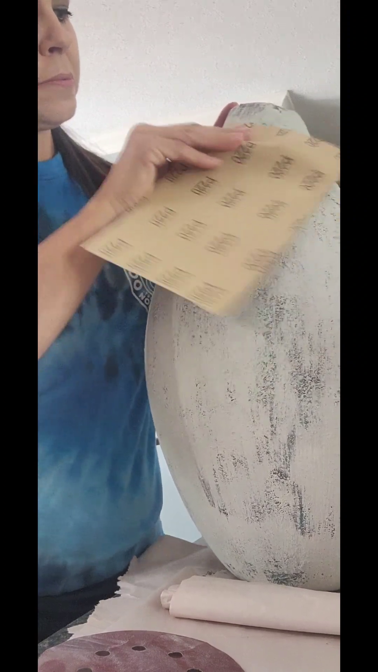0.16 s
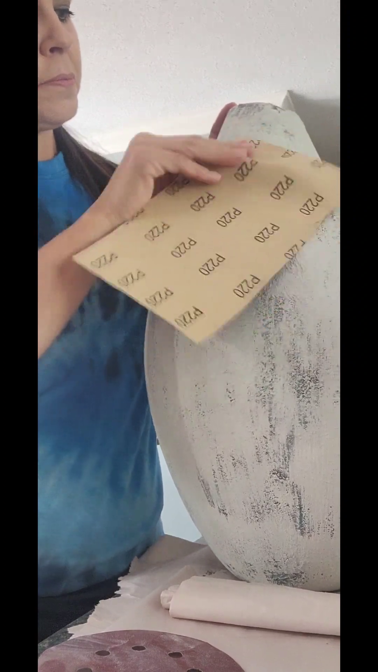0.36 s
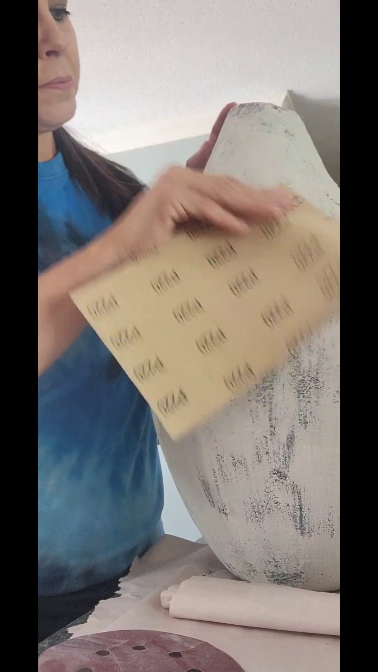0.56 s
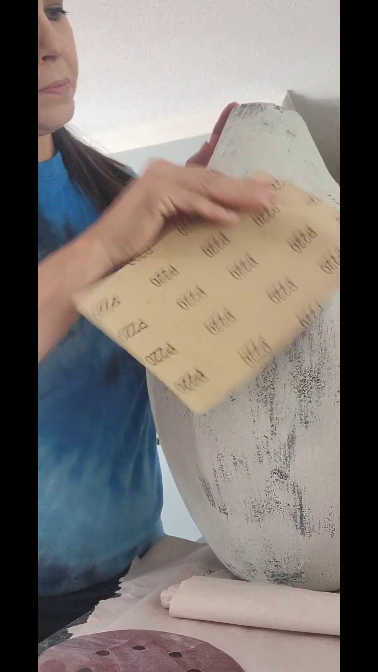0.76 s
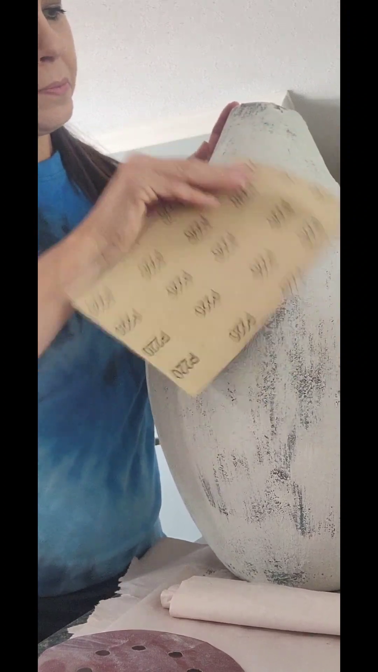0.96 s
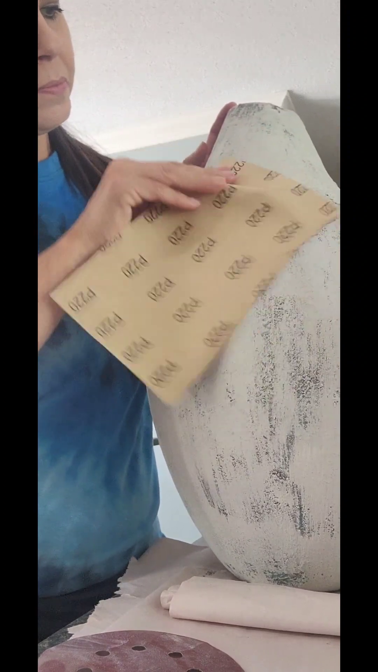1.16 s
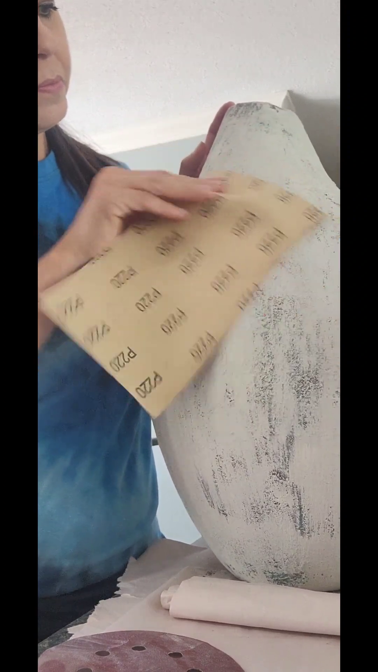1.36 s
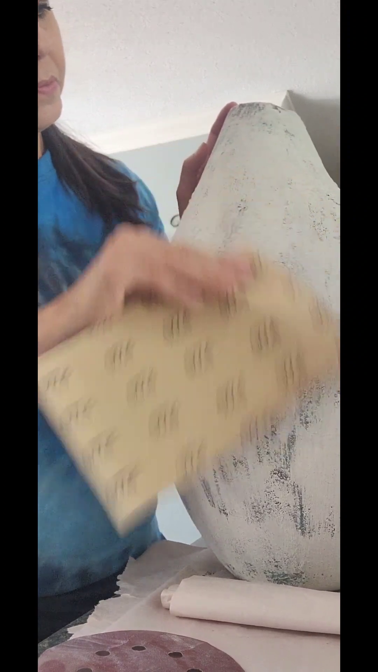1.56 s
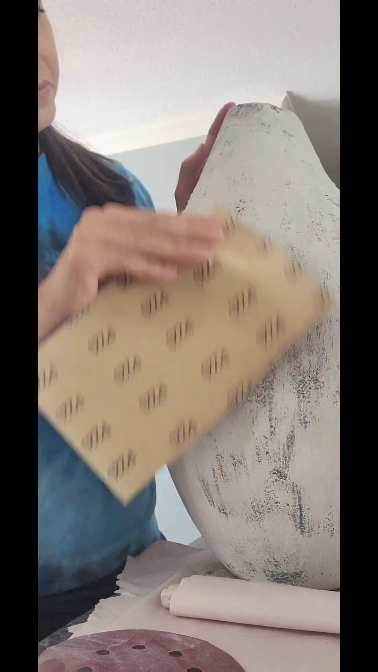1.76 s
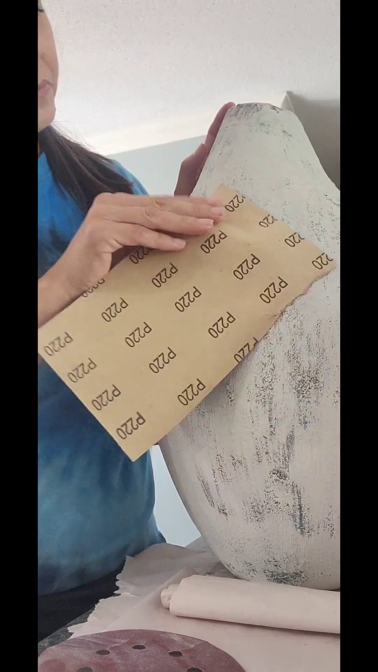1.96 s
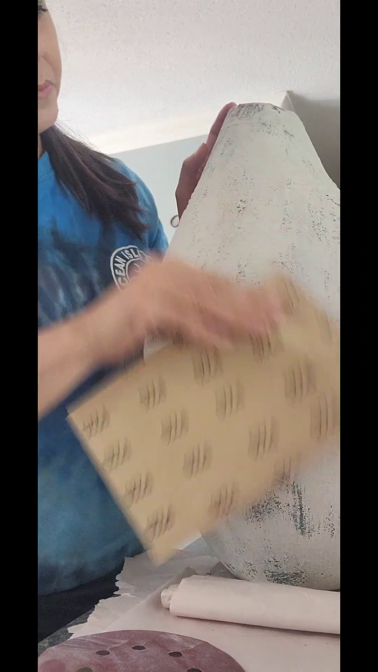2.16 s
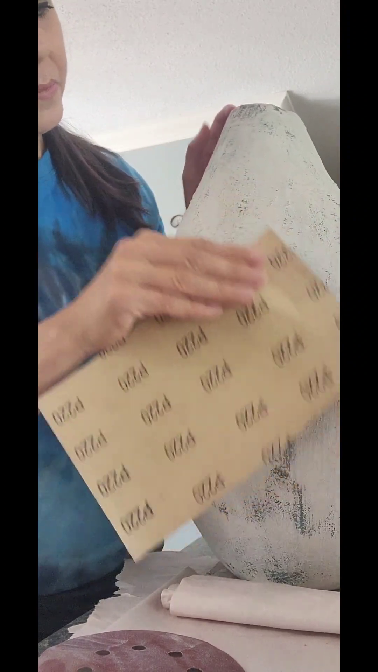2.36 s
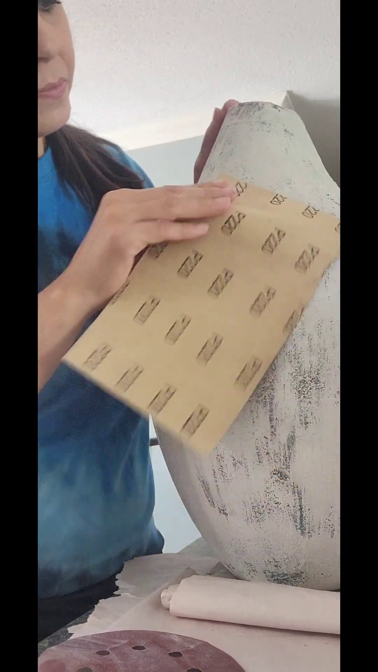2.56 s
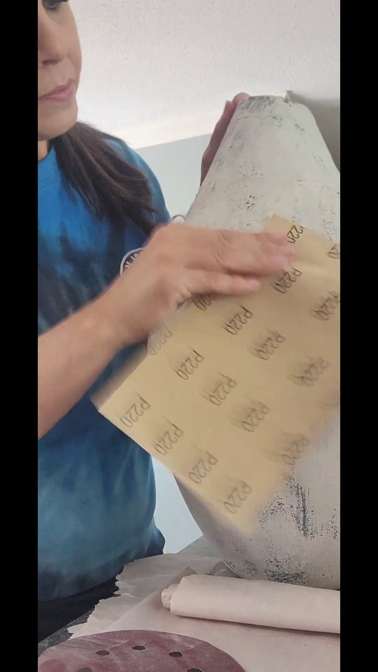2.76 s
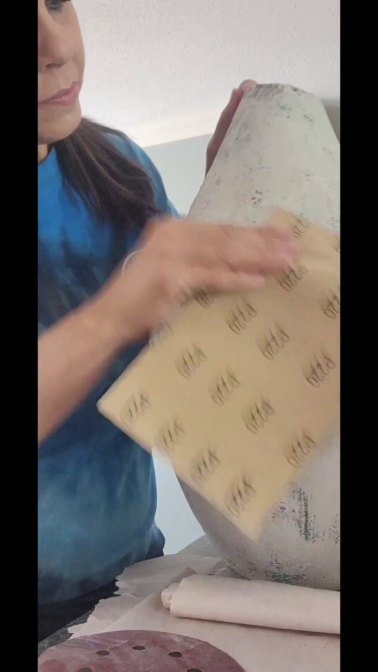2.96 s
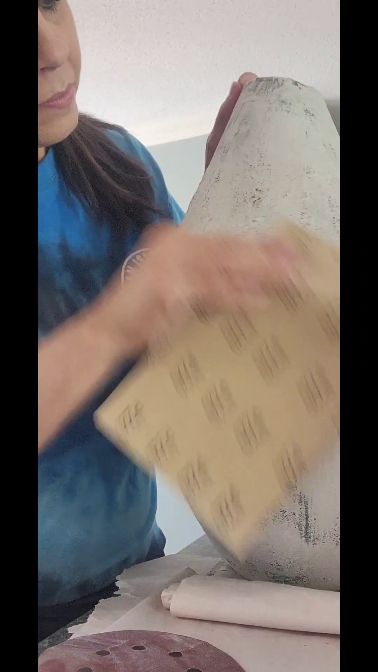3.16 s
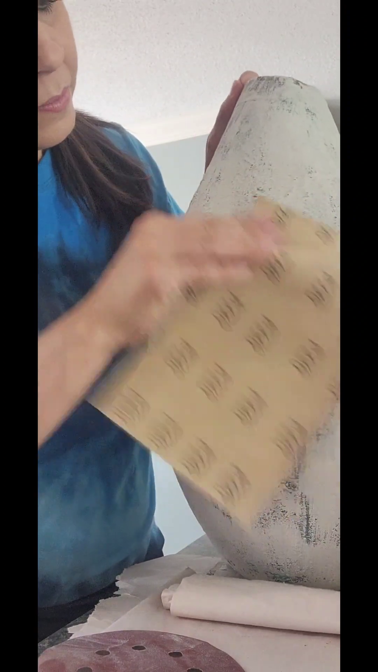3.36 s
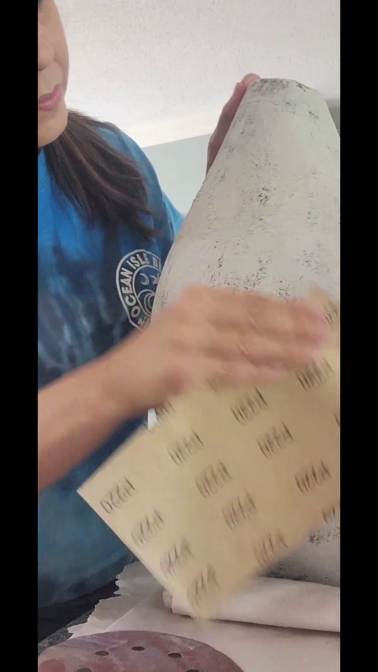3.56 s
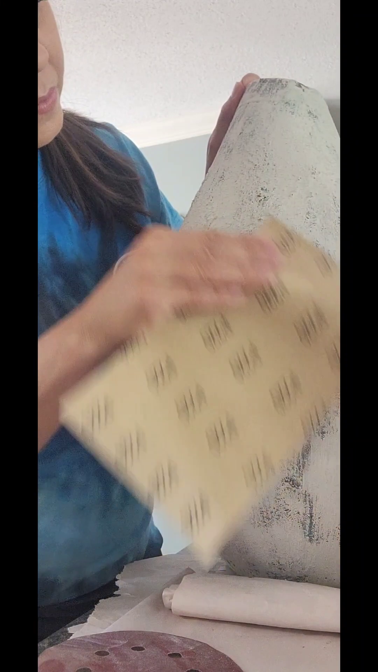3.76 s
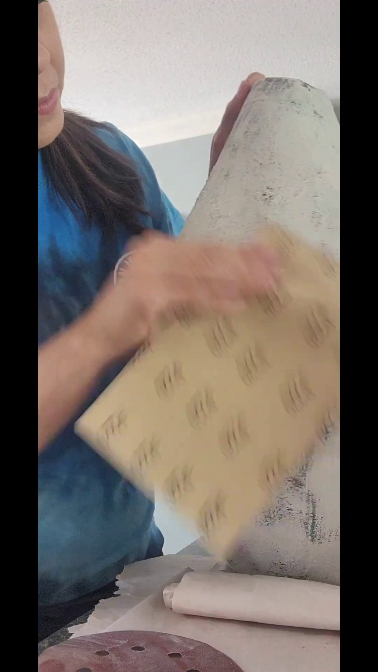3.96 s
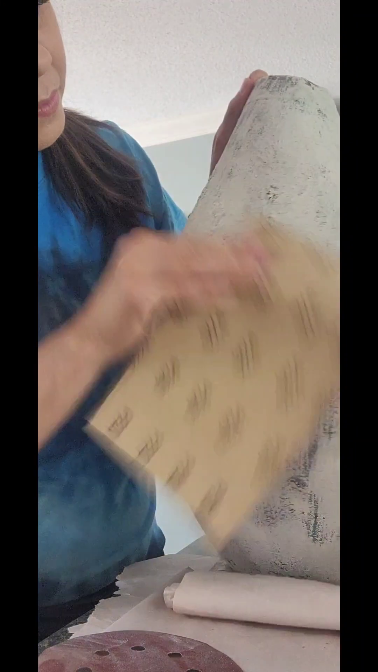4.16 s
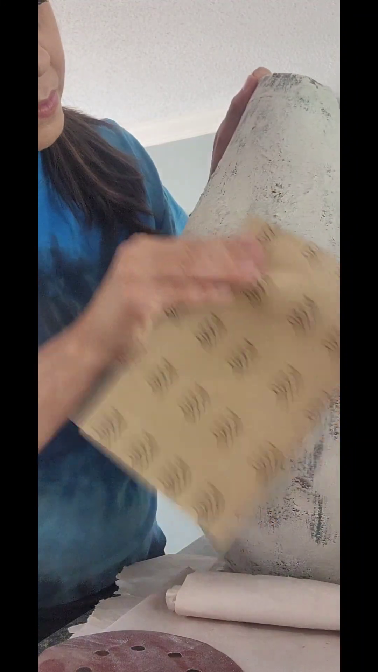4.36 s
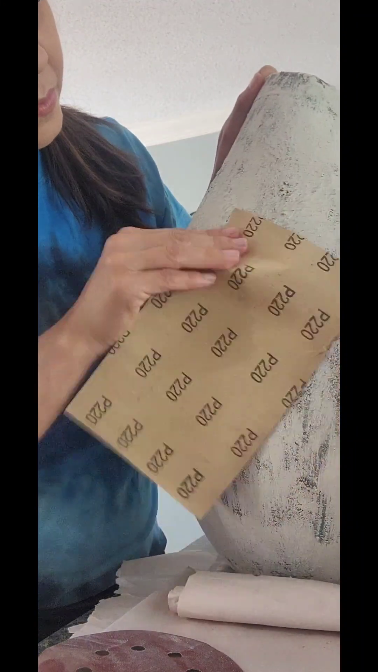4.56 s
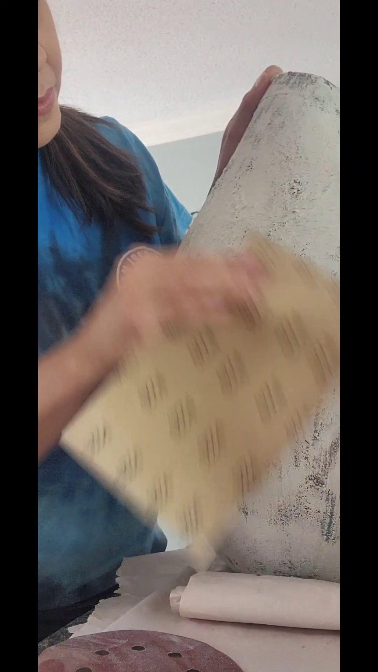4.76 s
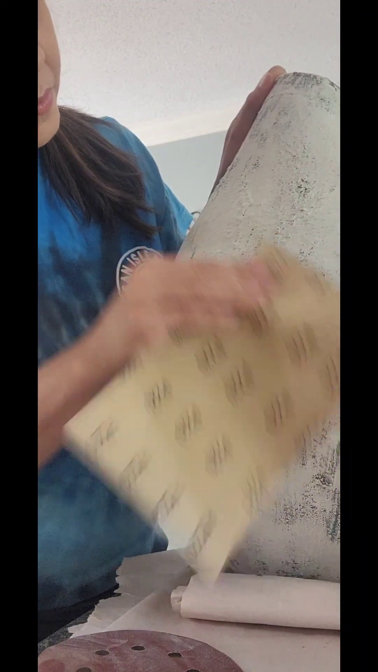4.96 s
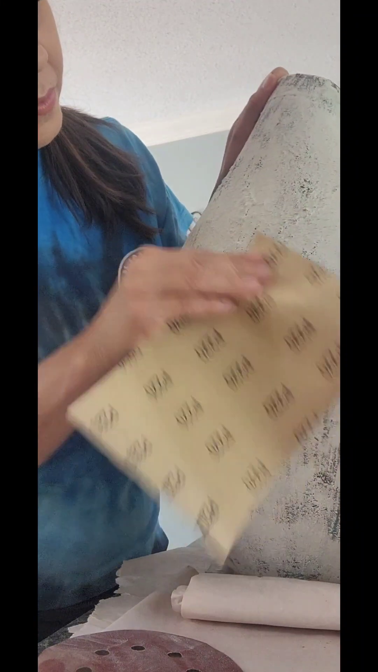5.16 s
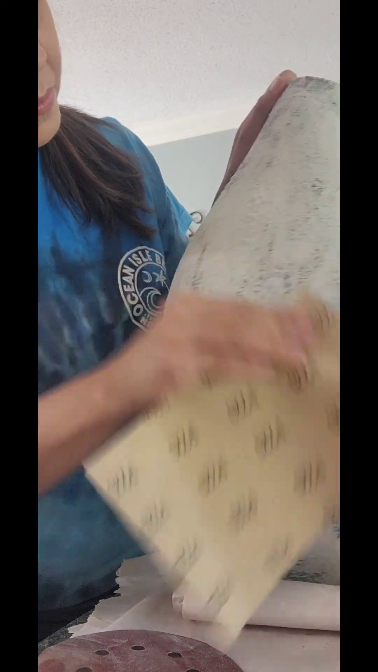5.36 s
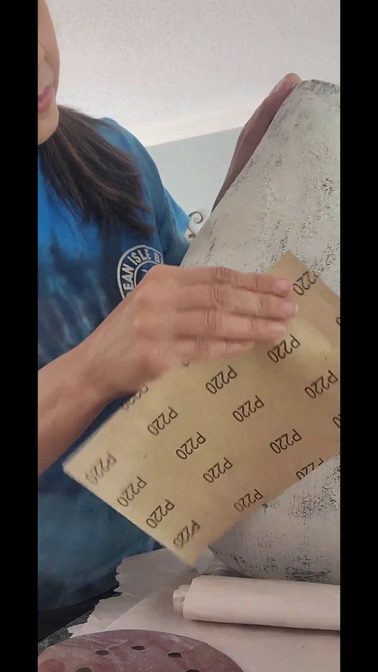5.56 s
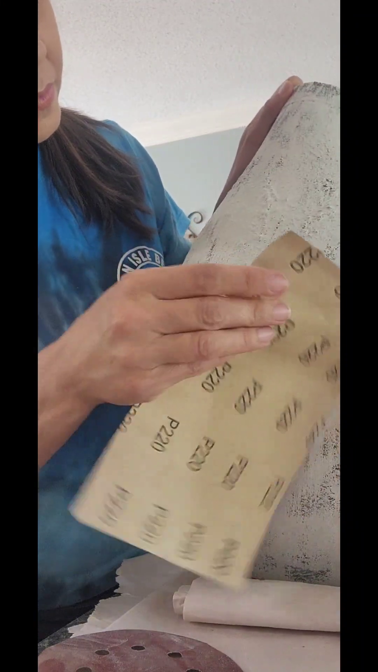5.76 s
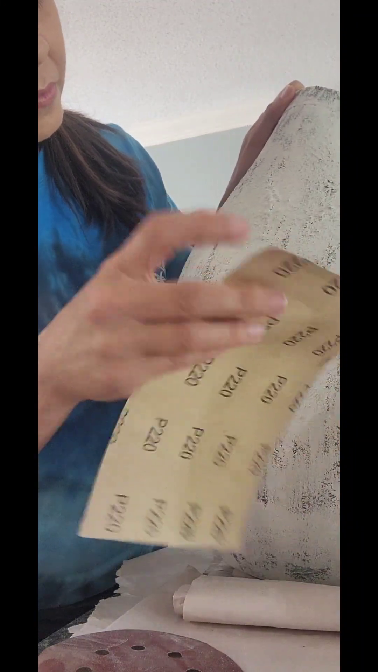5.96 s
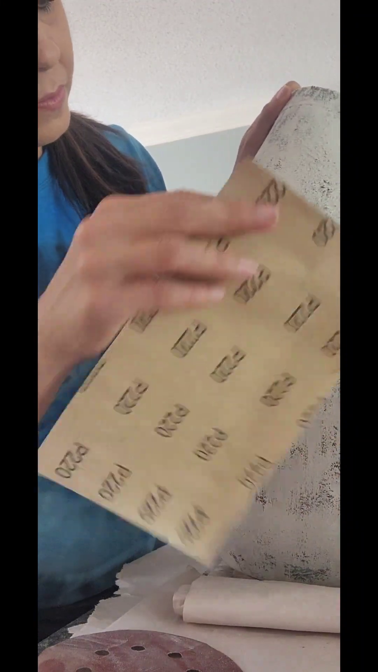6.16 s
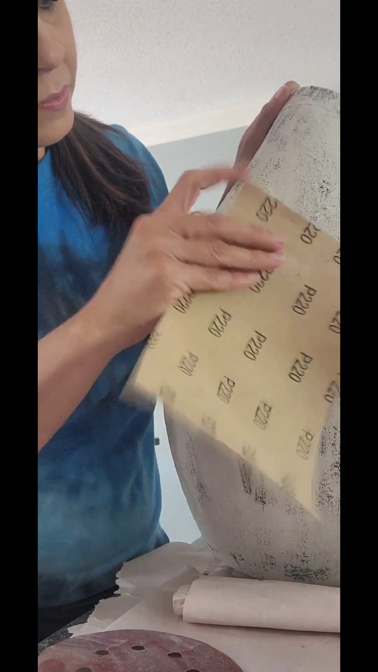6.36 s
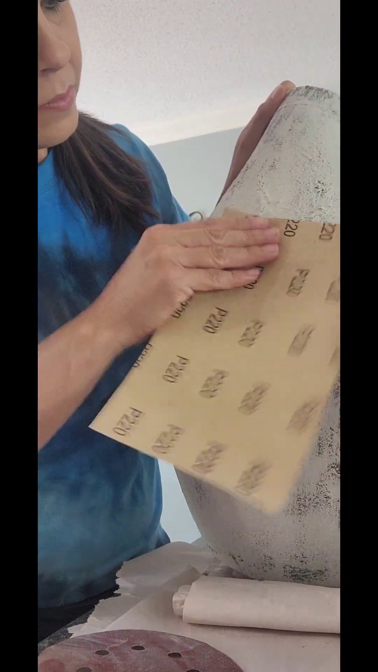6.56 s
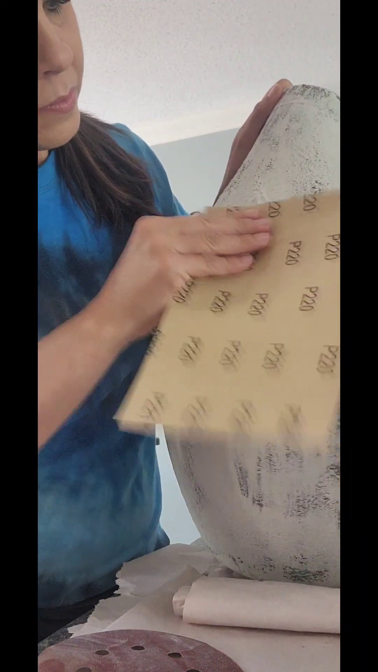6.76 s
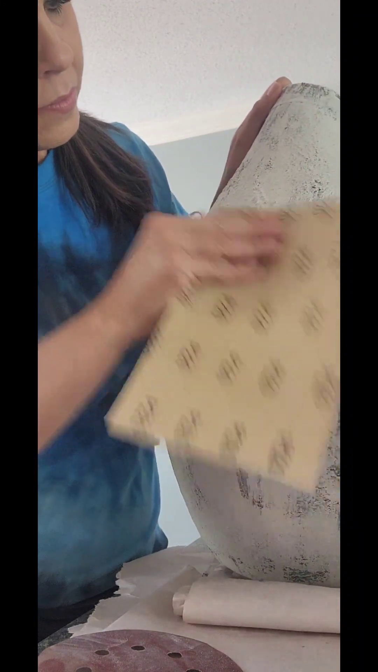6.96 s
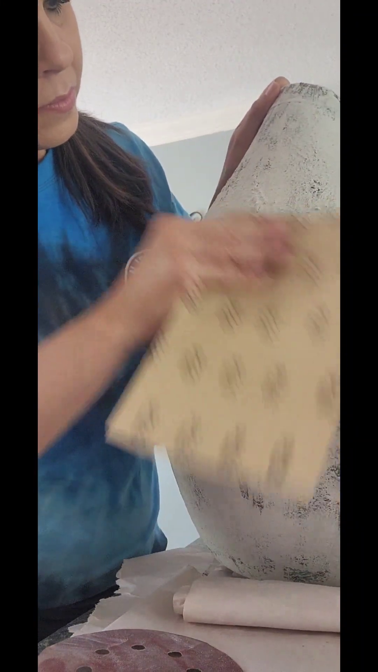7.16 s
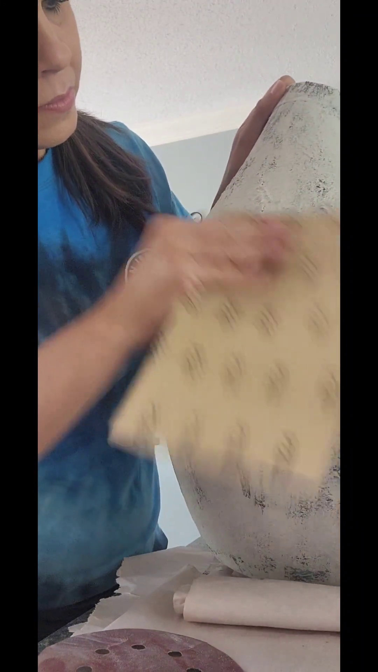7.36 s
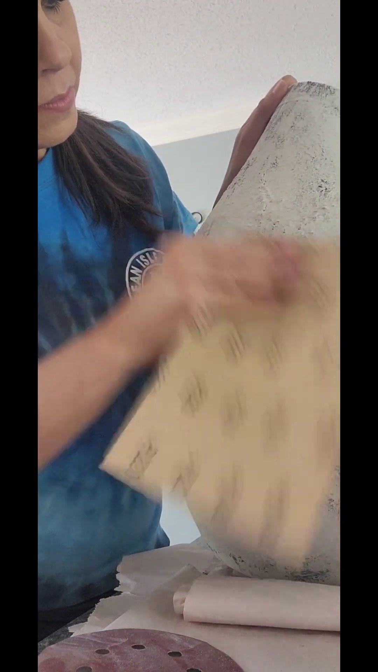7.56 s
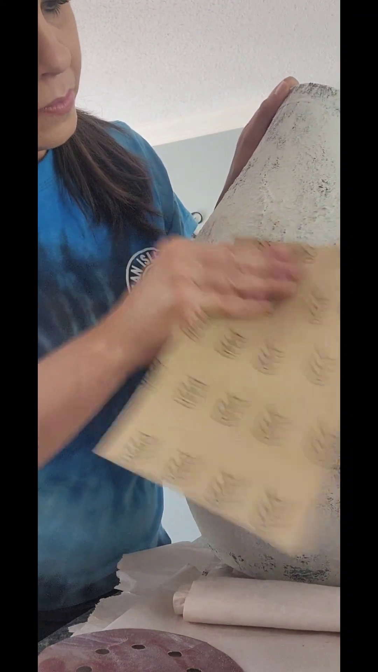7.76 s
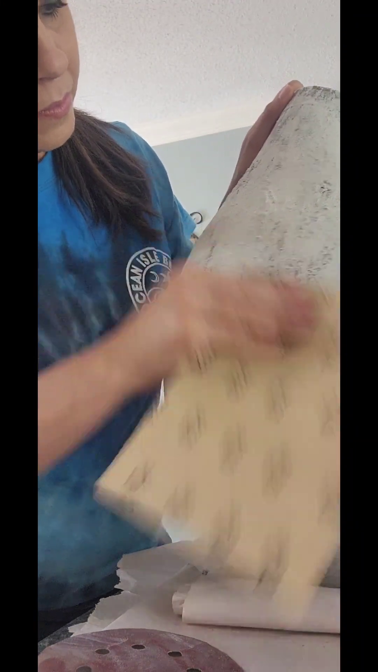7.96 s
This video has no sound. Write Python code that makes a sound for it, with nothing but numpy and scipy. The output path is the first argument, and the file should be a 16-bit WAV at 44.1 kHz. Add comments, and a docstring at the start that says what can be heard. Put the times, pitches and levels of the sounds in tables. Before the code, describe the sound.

A sheet of sandpaper is rubbed by hand over a big painted ceramic vase in quick, dry, back-and-forth strokes, with a faint hollow boom underneath. The rasping comes in runs with brief stops, and the paper cracks now and then. After a longer pause with soft brushing and finger taps, the strokes resume with a harder ring. The sound is close, in a small quiet room.

```python
"""In a small room, a sheet of sandpaper is rubbed by hand over a big painted ceramic vase.
Stick-slip friction of grit on paint makes a quick to-and-fro rasp, filtered by the sheet's resonances.
The loose paper brushes along, and the hollow vase booms in forced vibration over faint room air.
The paper cracks as it lands, bites or snaps, and fingers tap the wall. In a pause the hand takes
a new grip, and the strokes go on with a harder ring."""
import sys
import numpy as np
from scipy import signal
from scipy.fft import rfft, irfft, next_fast_len
from scipy.io import wavfile
from scipy.ndimage import map_coordinates

SR = 44100
rng = np.random.default_rng(int(sys.argv[2]) if len(sys.argv) > 2 else 0)


def dump_mix(stems):
    """Bounce the given channels to the path in sys.argv[1] as a 16-bit WAV at rate SR."""
    frames = np.atleast_2d(stems).T  # one column per channel
    limited = np.clip(frames, -1, 1)  # hard clip at full scale
    pcm = np.round(limited * 32767).astype(np.int16)
    wavfile.write(sys.argv[1], SR, pcm)


N = 354123
REGRIP_S, USUAL_STROKE_DB = 6.1, -20


def amp(db):
    """Amplitude ratio of a level in decibels."""
    return 10 ** (np.asarray(db) / 20)


def unit(x):
    """Normalisation to rms 1."""
    return x / np.sqrt(np.mean(x ** 2) + 1e-20)


def at_hz(points, hz):
    """Interpolation of (frequency, value) points on a logarithmic axis."""
    f, value = np.transpose(points)
    return np.interp(np.log(hz + 1), np.log(f + 1), value)


def at_time(points, s):
    """Linear interpolation of (time, value) points."""
    return np.interp(s, *np.transpose(points))


def add(mix, s, sound):
    """Superposition: a stereo sound joins the mix at time s."""
    first = round(s * SR)
    sound = sound[:, max(-first, 0):]
    part = mix[:, max(first, 0):][:, :sound.shape[1]]
    part += sound[:, :part.shape[1]]


def wander(size, span):
    """Smooth random modulation: a spline with a knot every span points."""
    knots = rng.standard_normal(int(size / span) + 4)
    return map_coordinates(knots, [np.arange(size) / span + 1], order=3)


def diffuse_noise(spectrum, apart):
    """Partly coherent steady noise: a shared signal plus a weaker one in antiphase."""
    gain = amp(at_hz(spectrum, np.fft.rfftfreq(N, 1 / SR)))
    shared, side = irfft(rfft(rng.standard_normal((2, N))) * gain, N)
    return unit(np.array([shared + apart * side, shared - apart * side]))


# Likeness of left and right: frequency_hz, coherence_ratio (clipped to 0..1)
COHERENCE = [(100, 3.5), (600, 0.7), (1300, 0.65), (1650, 0), (2100, 1.2), (4300, 0.3), (5500, 0.22),
             (8000, 0), (12000, -0.08)]
# Phase of left ahead of right: frequency_hz, lead_rad
PHASE_LEAD = [(0, 0), (690, -0.08), (1380, 2.5), (1640, -0.16), (2070, 6), (3190, 9.5), (3700, 16),
              (4310, 17.5), (5510, 25), (7320, 25), (9910, 40.5), (12700, 37.5), (15400, 57), (16000, 37.5)]
# Level of left above right: frequency_hz, balance_db
BALANCE = [(500, -1), (850, -6), (1350, -9), (1750, 0), (2500, -1.5), (2950, -2), (3350, 1.5), (4600, -3),
           (5050, 0), (6300, 1.5), (8300, 5.5), (11200, 2.5), (12500, -3), (15500, 4)]

def stereo(pair, colour_db):
    """Spaced pickup: two coloured noises blend with the coherence, phase and balance of two ports."""
    size = pair.shape[1]
    hz = np.fft.rfftfreq(size, 1 / SR)
    left, other = rfft(pair)
    coherence = np.clip(at_hz(COHERENCE, hz), 0, 1)
    right = (coherence * left + np.sqrt(1 - coherence ** 2) * other) * np.exp(-1j * at_hz(PHASE_LEAD, hz))
    balance_db = at_hz(BALANCE, hz)
    sides = amp([balance_db / 2, -balance_db / 2])
    sides /= np.sqrt(np.mean(sides ** 2, 0))
    return unit(irfft(np.array([left, right]) * sides * amp(colour_db), size))


def grit(size, catches_per_s, catch_db, spread_db, judder_db, judder_hz):
    """Stick-slip friction: fine grains hiss, coarse ones catch and break free, and the sheet judders."""
    chance, strength = rng.random(size), np.minimum(rng.exponential(1, size), 3)
    catches = (chance < catches_per_s / SR) * amp(spread_db * strength)
    bursts = signal.lfilter([1], [1, -np.exp(-1 / (0.00039 * SR))], catches ** 2)
    force = np.sqrt(1 + amp(catch_db) ** 2 * bursts / (bursts.mean() + 1e-9))
    judder = amp(judder_db * np.tanh(wander(size, SR / judder_hz)))
    return force * judder * rng.standard_normal((2, size))


# Friction spectrum of grit on paint: frequency_hz, density_db
FRICTION_SPECTRUM = [(40, -42.5), (170.0, -23), (280.0, -18.5), (450.0, -14.5), (900.0, -14.5),
                     (1150.0, -8), (2500.0, 2), (4500.0, -1.5), (6500.0, -3), (8600.0, -14.5),
                     (10500.0, -16.5), (12700.0, -10), (15500.0, -15)]
# Resonances of the sheet in the first grip: pitch_hz, width_hz, lift_db
FIRST_GRIP_MODES = [(373, 24, 3.5), (515, 45, 7.5), (679, 115, 9.5), (1180, 290, 11), (1403, 126, 6),
                    (1937, 430, 5.5), (2124, 97, 2.5), (3268, 285, 5), (4300, 260, 5.5), (5073, 160, 7.5),
                    (5850, 400, 3.5), (6450, 560, 2), (7850, 170, 6)]
# Resonances of the sheet in the second grip: pitch_hz, width_hz, lift_db
SECOND_GRIP_MODES = [(206, 74, 11.2), (377.3, 97, 8.6), (501, 31, 7.5), (660, 420, 10), (1173, 110, 9),
                     (1328, 62, 7), (1990, 350, 9.1), (2200, 130, 7), (2610, 110, 6.5), (3444, 530, 7.9),
                     (4340, 280, 7.5), (5460, 1500, 5), (6260, 320, 4.1), (8600, 280, 5.8)]
# How freely the loose end of the sheet rings: time_s, lift_db
FREE_END_LIFT = [(0, 7), (0.6, 3), (1.3, 2), (3.4, -2), (5.2, 0), (6.7, 0.0), (8, 2.5)]

def sheet_colour(s, hz, bass_db, treble_db, lift_db=0):
    """Resonant filtering, in dB: the sheet's modes shape the friction, and shift as the paper bends."""
    free_end = (2090, 510, at_time(FREE_END_LIFT, s) + lift_db)
    modes = [*(FIRST_GRIP_MODES if s < REGRIP_S else SECOND_GRIP_MODES), free_end]
    bent_hz = hz * (1 + .016 * rng.standard_normal())
    ring_db = sum(db / (1 + (2 * (bent_hz - f) / width) ** 2) for f, width, db in modes)
    shelves_db = bass_db / (1 + (hz / 1350) ** 3) + treble_db * (1 - 1 / (1 + (hz / 5500) ** 4))
    ripple_db = 1.9 * wander(len(hz), 130 / hz[1])
    return at_hz(FRICTION_SPECTRUM, hz) + ring_db + shelves_db + ripple_db


# How well the spot under the hand shakes the wall of the vase: time_s, coupling_db
WALL_COUPLING = [(0, -2.5), (1.4, -1), (1.6, -3.5), (2.1, -6.5), (3.0, -5), (3.85, -4), (4.7, 1),
                 (5.3, 5.5), (5.5, 0), (6.8, -2), (8, 1)]
# Slow drift of the rasp's treble: time_s, lift_db
TREBLE_DRIFT = [(0, 1.5), (2.2, -1.5), (2.8, -4), (3.9, -4.5), (4.8, 2.0), (7, -0.5), (8, 3)]

def stroke(start, end, db, crest, direction):
    """Sliding friction: the rasp grows louder and brighter with the hand's speed and pressure."""
    overlap_s = .0172  # the sheet still slides while the hand turns
    first, last = start - overlap_s, end + overlap_s
    fastest = start + np.clip(crest, .05, .95) * (end - start)
    size = next_fast_len(max(round((last - first) * SR), 512))
    along = np.interp(first + np.arange(size) / SR, [first, fastest, last], [0, .5, 1])
    speed = np.maximum(np.sin(np.pi * along), 1e-4)
    pressure_db = db - USUAL_STROKE_DB
    # Light strokes are mostly the dull sound of the wall; firm ones hiss more.
    bass_db = -2 + at_time(WALL_COUPLING, start) - .5 * pressure_db
    treble_db = -.5 + at_time(TREBLE_DRIFT, start) + 0.16 * pressure_db
    hz = np.fft.rfftfreq(size, 1 / SR)
    scratch = grit(size, catches_per_s=980, catch_db=-5.5, spread_db=-0.5, judder_db=1.5, judder_hz=170)
    rasp = stereo(scratch, sheet_colour(start, hz, bass_db, treble_db, lift_db=0.8 * direction))
    low = irfft(rfft(rasp) / (1 + (hz / 1000) ** 4), size)
    high = irfft(rfft(rasp) * (1 - 1 / (1 + (hz / 7000) ** 4)), size)
    # The second grip swells more steeply, then levels off.
    exponent, saturation = (2.35, 0.44) if start < REGRIP_S else (5.1, 2.8)
    swell = speed ** max(exponent + 0.0349 * pressure_db, .2)
    drive = np.tanh(saturation * swell) / np.tanh(saturation)
    return first, amp(db) * (low * drive ** 0.39 + (rasp - low - high) * drive + high * drive ** 1.47)


# Strokes of the hand: start_s, level_db, crest_fraction (how far into the stroke speed peaks)
HAND_STROKES = [(-0.033, -24, 0.14), (0.073, -24.5, 0.55), (0.167, -25.5, 0.53), (0.285, -23.5, 0.59),
                (0.389, -28, 0.56), (0.503, -19.0, 0.63), (0.644, -33, 0.51), (0.699, -18.5, 0.2),
                (0.805, -22, 0.69), (0.908, -21.5, 0.55), (1.036, -23, 0.7), (1.149, -24, 0.58),
                (1.273, -22, 0.72), (1.39, -21.5, 0.59), (1.521, -19, 0.35), (1.934, -45.5, 0.54),
                (1.996, -45, 0.36), (2.102, -21.0, 0.76), (2.663, -38.5, 0.9), (2.755, -17, 0.6),
                (2.88, -18, 0.52), (2.993, -19.5, 0.73), (3.102, -19, 0.69), (3.201, -18.5, 0.69),
                (3.329, -17.5, 0.49), (3.444, -17.5, 0.46), (3.842, -18.5, 0.66), (3.98, -20.5, 0.76),
                (4.11, -20.5, 0.71), (4.22, -20, 0.56), (4.35, -17.5, 0.4), (4.445, -20.5, 0.53),
                (4.565, -18, 0.61), (4.683, -20.0, 0.58), (4.827, -16.5, 0.45), (4.931, -21.5, 0.51),
                (5.051, -18.5, 0.49), (5.14, -23.0, 0.55), (5.234, -24, 0.61), (5.32, -29.0, 0.79),
                (5.397, -20, 0.25), (5.704, -47, 0.34), (6.509, -36, 0.27), (6.67, -26.0, 0.69),
                (6.788, -21.5, 0.54), (6.896, -21.5, 0.59), (7.009, -21.5, 0.6), (7.111, -22.5, 0.49),
                (7.224, -21, 0.38), (7.333, -20.5, 0.53), (7.443, -20.5, 0.5), (7.563, -21.0, 0.43),
                (7.679, -20, 0.32), (7.8, -21.5, 0.37), (7.898, -20, 0.48), (7.987, -20.5, 0.72)]
# The hand comes to rest: time_s
HAND_RESTS = [1.772, 2.323, 3.637, 5.536, 5.952, 8.117]

def sanding():
    """Reciprocating motion: pushes and pulls alternate, each lasting until the next turn or rest."""
    out = np.zeros((2, N))
    turns = [row[0] for row in HAND_STROKES] + list(HAND_RESTS)
    for k, (start, db, crest) in enumerate(HAND_STROKES):
        end = min(s for s in turns if s > start)
        add(out, *stroke(start, end, db, crest, direction=(-1) ** k))
    return out


def shifting_contact(x, depth_db):
    """Spectral modulation: as the contact spots shift, narrow bands flare and fade for some 15 ms."""
    spectra = signal.stft(x, SR, nperseg=512, noverlap=384)[2]
    knots = rng.standard_normal(spectra.shape[1:])
    band, frame = np.indices(knots.shape)
    patches = map_coordinates(knots, [band / 4, frame / 5], order=1)
    spectra = spectra * unit(amp(depth_db * unit(patches)))
    return signal.istft(spectra, SR, nperseg=512, noverlap=384)[1][:, :N]


# The loose sheet slips as the hand sets off or shifts: peak_s, level_db, rise_s, fall_s
SHEET_SLIPS = [(1.946, -53, .002, 0.018), (2.663, -48, .002, 0.038), (3.842, -35.5, 0.0035, .03),
               (6.05, -71, .08, 0.11), (6.255, -54.5, 0.01, 0.0093), (6.47, -47, 0.056, 0.069),
               (6.635, -47, .004, 0.014)]

def brushing(steady_db=-70):
    """Friction under light load: the loose sheet grazes the vase all the time, louder at each slip."""
    colour_db = sheet_colour(0, np.fft.rfftfreq(N, 1 / SR), bass_db=9.5, treble_db=-0.5, lift_db=-9)
    slide = grit(N, catches_per_s=150, catch_db=-6, spread_db=4, judder_db=2.5, judder_hz=60)
    t = np.arange(N) / SR
    slips = sum(amp(db) * np.exp(-np.maximum((s - t) / rise, (t - s) / fall))
                for s, db, rise, fall in SHEET_SLIPS)
    return (amp(steady_db) + slips) * stereo(slide, colour_db)


# Hollow boom of the vase and its stand: frequency_hz, density_db
BOOM_SPECTRUM = [(20, -38), (42, -10.5), (52, -23), (66, -3.5), (83, -0.5), (98, -10), (130, -9),
                 (165, -23), (260, -36.5)]

def vase_boom(rasp, ring_s=0.023):
    """Forced vibration: the vase stores the rubbing's energy, so its boom lags behind the strokes."""
    t = np.arange(N) / SR
    retained = np.exp(-1 / (ring_s * SR))
    power = signal.lfilter([1 - retained], [1, -retained], np.mean(rasp ** 2, 0))
    shake = (np.sqrt(power) / amp(USUAL_STROKE_DB)) ** 0.58  # even light strokes shake the wall
    grip_db = np.where(t < REGRIP_S, -31.5, -25)
    boom_db = USUAL_STROKE_DB + grip_db + 0.5 * at_time(WALL_COUPLING, t)
    return shake * amp(boom_db) * diffuse_noise(BOOM_SPECTRUM, apart=0.37)


# Background of the still room: frequency_hz, density_db
AIR_SPECTRUM = [(15, -40), (25, -1), (112, 3), (588, -8), (856, -12.5), (1120, -12.5), (1580, -29),
                (2560, -7.5), (5010, -21), (9770, -41), (15000, -54)]

def room_air(level_db=-66):
    """Ambient noise floor: a faint, steady rush, strongest in the bass."""
    return amp(level_db) * diffuse_noise(AIR_SPECTRUM, apart=0.36)


# Time the room takes to decay by 60 dB: frequency_hz, decay_s
REVERB_TIMES = [(150, 0.19), (700, 0.45), (2000, 0.41), (5000, 0.35), (9000, 0.27), (15000, 0.41)]

def reverberation(x, gap_s=.006, echoes_per_s=3000):
    """Reflection and absorption: sparse echoes of random sign, each band dying at its own rate."""
    echoes = rng.choice([-1., 1.], (2, SR)) * (rng.random((2, SR)) < echoes_per_s / SR)
    echoes *= np.arange(SR) > gap_s * SR
    hz, t, spectra = signal.stft(echoes, SR, nperseg=256)
    decay = amp(-60 * t / at_hz(REVERB_TIMES, hz)[:, None])
    tail = signal.istft(spectra * decay, SR, nperseg=256)[1]
    tail = signal.lfilter([1], [1, -.3], tail)  # soft furnishings dull the echoes
    return signal.fftconvolve(x, tail / np.linalg.norm(tail[0]), axes=1)[:, :N]


# Response of the vase wall to a knock: frequency_hz, density_db
THUD_SPECTRUM = [(60, -22), (200, -20), (400, -1.5), (600, -7), (770, 1.5), (1000, -7), (1250, 3),
                 (1600, -14.5), (3000, -39), (15000, -68.5)]

def impact(s, crack_db, thud_db, tick_db, size=2048):
    """Impulsive excitation: the sheet cracks, the grit ticks and the wall thuds, all heavily damped."""
    t, hz = np.arange(size) / SR, np.fft.rfftfreq(size, 1 / SR)
    crack = (crack_db - 5, sheet_colour(s, hz, bass_db=-0.5, treble_db=-20), 0.0042)
    tick = (tick_db - 1, at_hz([(2000, -26.5), (6500, 9), (9000, -6.5), (15000, -7)], hz), 0.0042)
    thud = (thud_db - 2, at_hz(THUD_SPECTRUM, hz), 0.0048)
    out = np.zeros((2, size))
    for db, colour_db, decay_s in (crack, tick, thud):
        burst = (1 - np.exp(-t / 0.0011)) * np.exp(-t / decay_s)
        out += amp(db) * burst / burst.max() * stereo(rng.standard_normal((2, size)), colour_db)
    return out


# Sharp cracks and ticks of the sandpaper, levels relative within each column: start_s, crack_db, tick_db
PAPER_CRACKS = [(0.7037, -12, -35), (1.671, -23, -39), (1.7052, -11.5, -33), (2.228, -13, -26),
                (2.6614, -47, -49), (3.5254, -14, -24), (3.8400, -40, -34), (3.9985, -18, -38),
                (4.5905, -14, -24), (5.0789, -14, -20), (5.244, -23, -41), (6.4707, -19, -33.5),
                (6.4864, -32, -52), (6.5288, -26, -38), (6.7204, -19, -28), (7.1259, -19.5, -23.5),
                (7.4563, -16.5, -39), (7.7397, -18, -31)]

def paper_cracks():
    """Transient excitation: the sheet cracks as it lands, bites or snaps, and faintly knocks the wall."""
    out = np.zeros((2, N))
    for s, crack_db, tick_db in PAPER_CRACKS:
        add(out, s, impact(s, crack_db, thud_db=crack_db - 31.5, tick_db=tick_db))
    return out


# Fingers landing, levels relative within each column: start_s, thud_db, crack_db
FINGER_TAPS = [(2.7, -43.5, -34), (3.6562, -31.5, -29), (6.258, -44, -46), (6.3964, -37.5, -40),
               (6.4424, -28, -22), (7.72, -25, -15.5), (7.9385, -26, -17)]

def finger_taps():
    """Contact impact: a finger strikes the wall through the sheet, which cracks under it."""
    out = np.zeros((2, N))
    for s, thud_db, crack_db in FINGER_TAPS:
        add(out, s, impact(s, crack_db, thud_db, tick_db=crack_db - 20))
    return out


def scene():
    """Superposition: the paper's direct sound and its echoes, over the vase's boom and the room air."""
    brush = brushing()
    rasp = shifting_contact(sanding(), depth_db=2.2)
    paper = amp(0.08) * rasp + brush + paper_cracks() + finger_taps()
    return paper + amp(-15) * reverberation(paper) + vase_boom(rasp) + room_air()


def record(dry, cutoff_hz=15900):
    """Band limiting: a steep low-pass filter removes the highest treble."""
    lowpass = signal.firwin(511, cutoff_hz, window=("kaiser", 9), fs=SR)
    return signal.oaconvolve(dry, lowpass[None], "same")


dry = scene()
out = record(dry)
dump_mix(out)
```